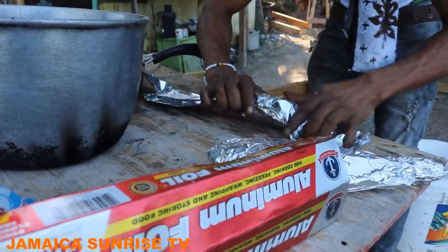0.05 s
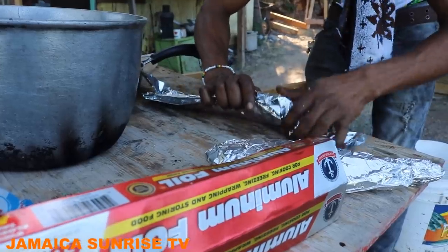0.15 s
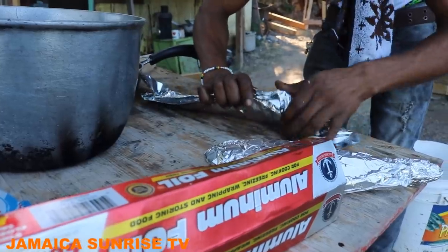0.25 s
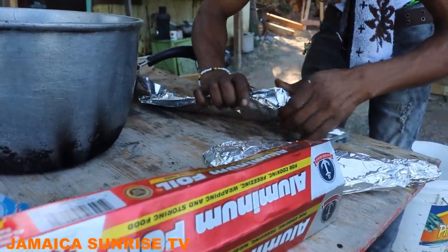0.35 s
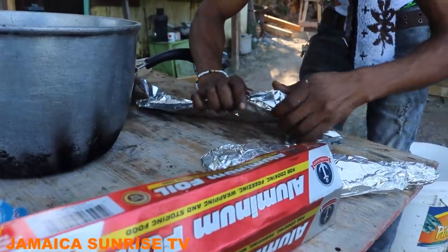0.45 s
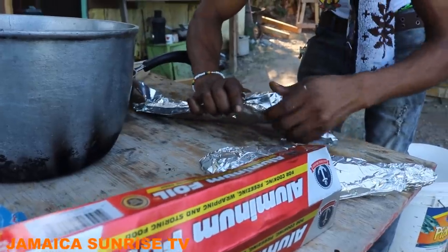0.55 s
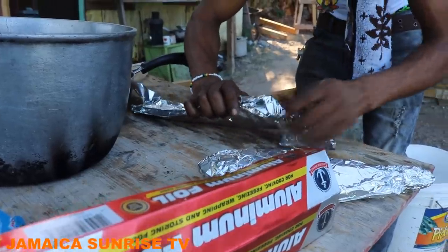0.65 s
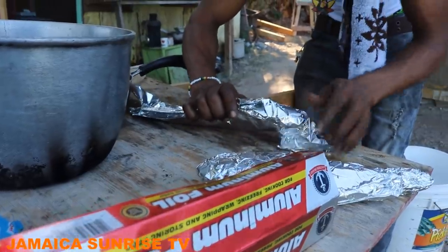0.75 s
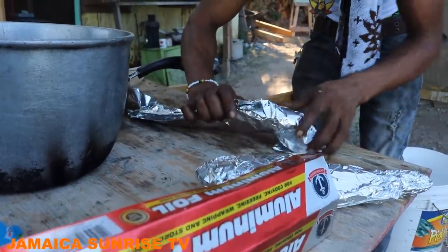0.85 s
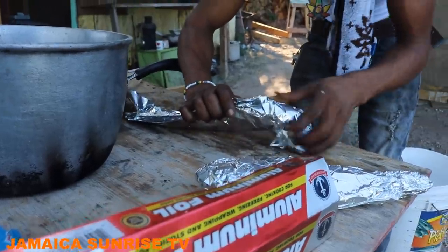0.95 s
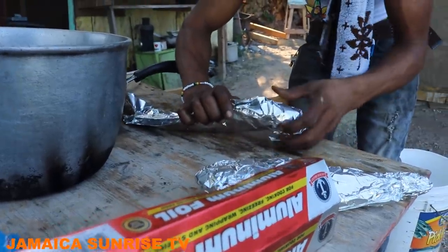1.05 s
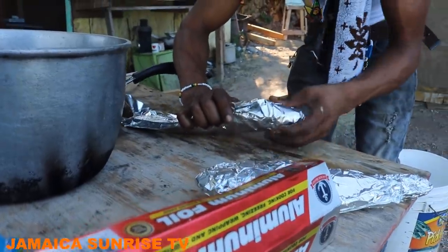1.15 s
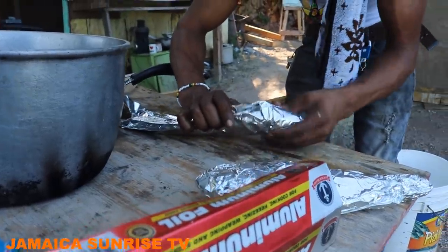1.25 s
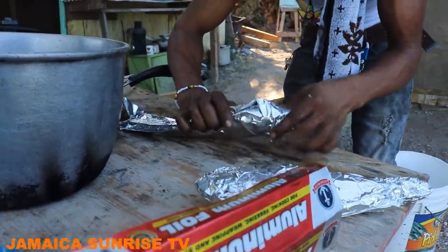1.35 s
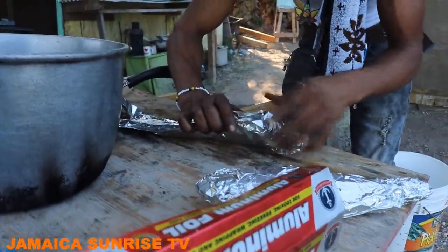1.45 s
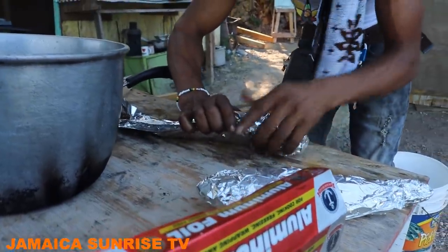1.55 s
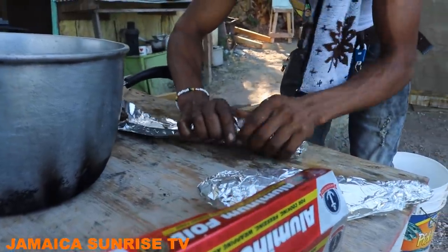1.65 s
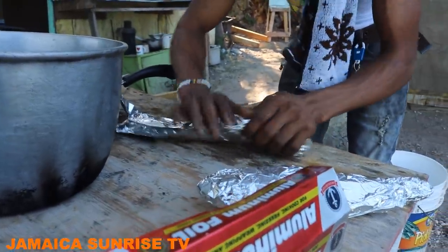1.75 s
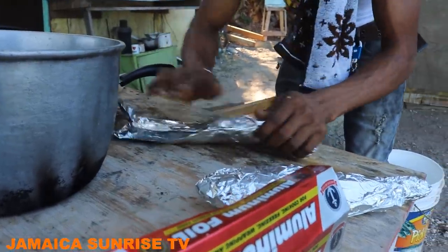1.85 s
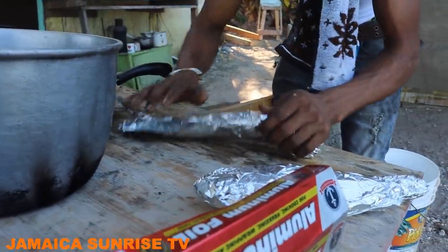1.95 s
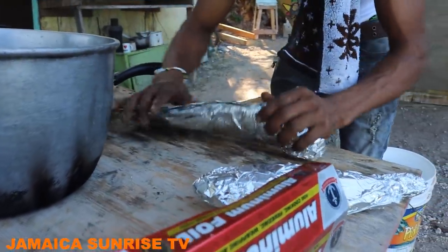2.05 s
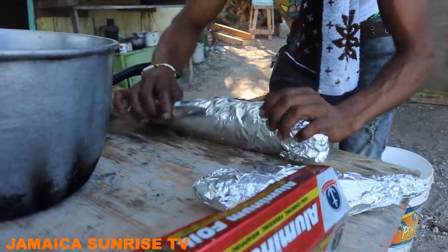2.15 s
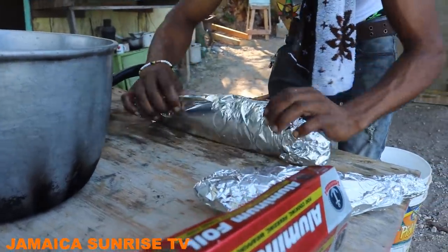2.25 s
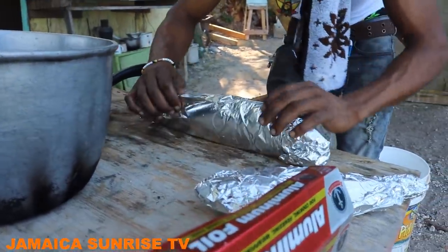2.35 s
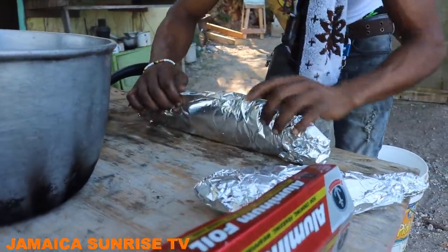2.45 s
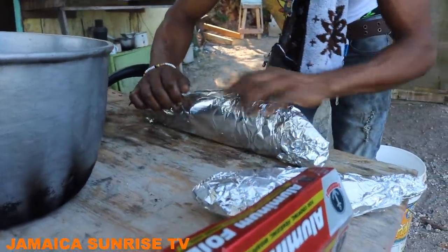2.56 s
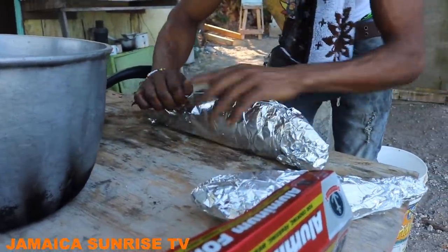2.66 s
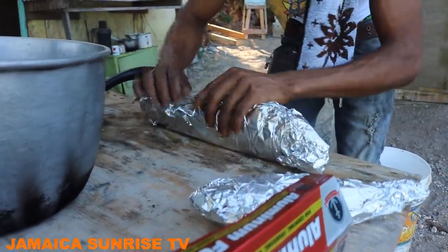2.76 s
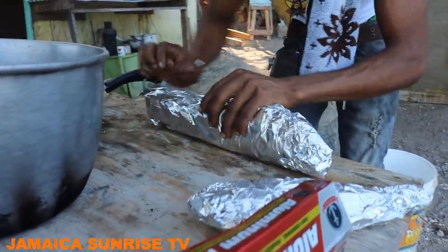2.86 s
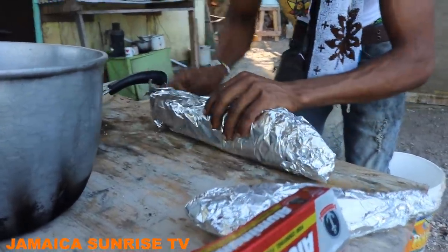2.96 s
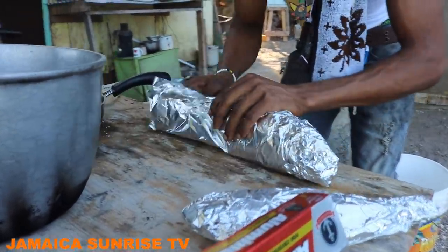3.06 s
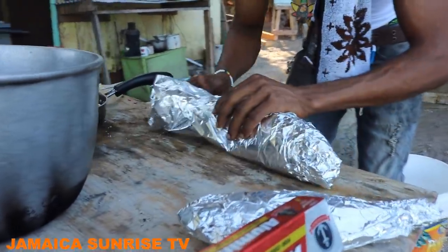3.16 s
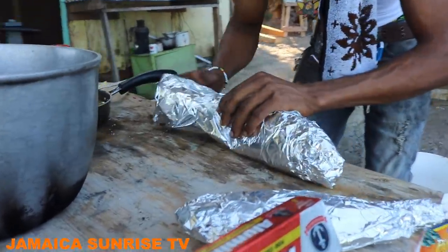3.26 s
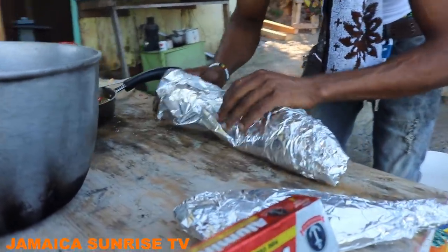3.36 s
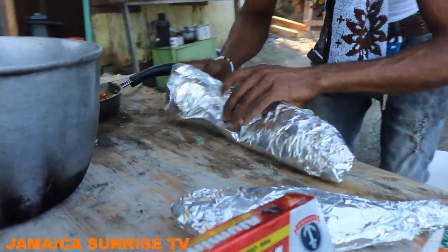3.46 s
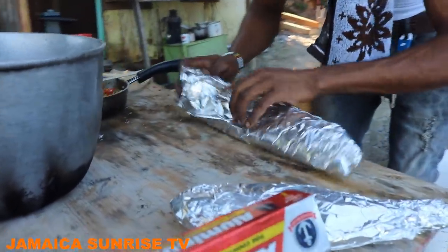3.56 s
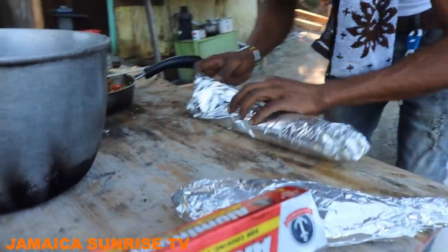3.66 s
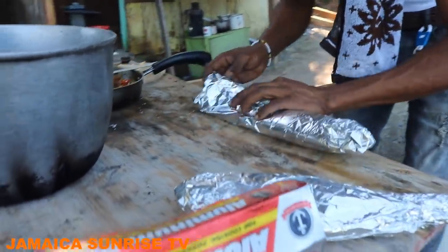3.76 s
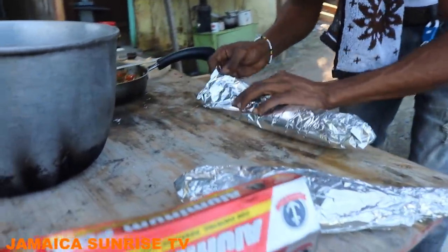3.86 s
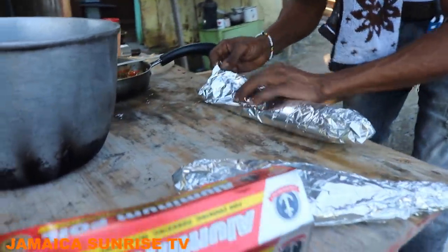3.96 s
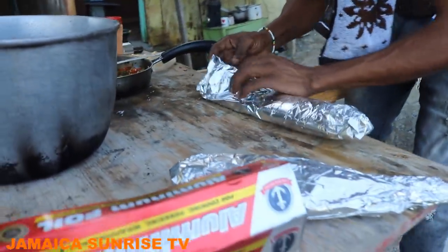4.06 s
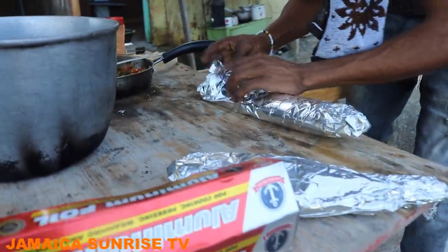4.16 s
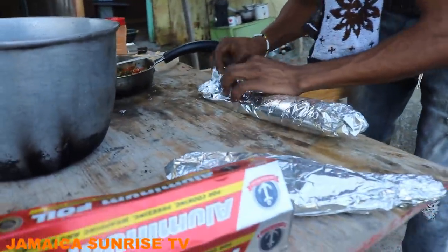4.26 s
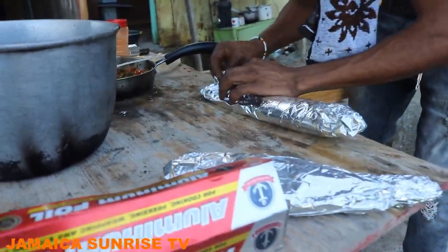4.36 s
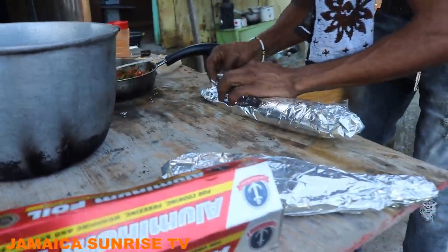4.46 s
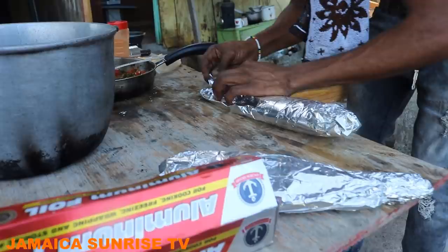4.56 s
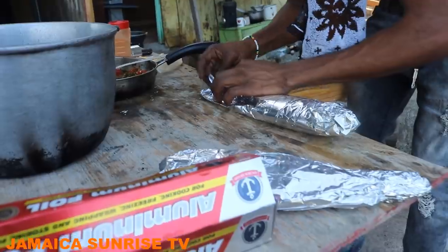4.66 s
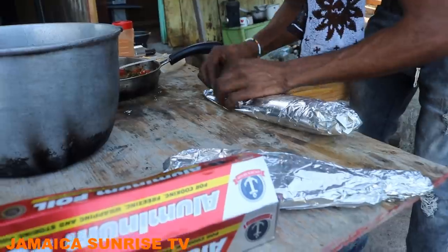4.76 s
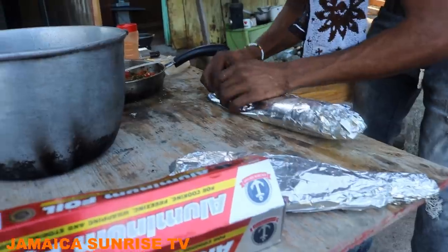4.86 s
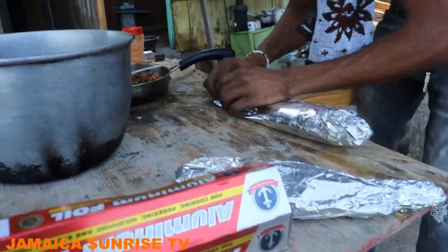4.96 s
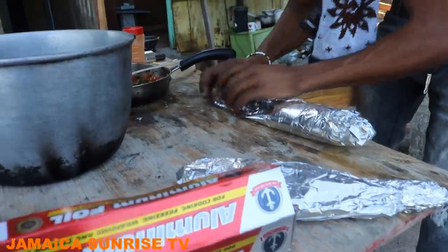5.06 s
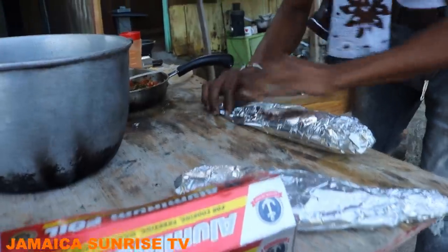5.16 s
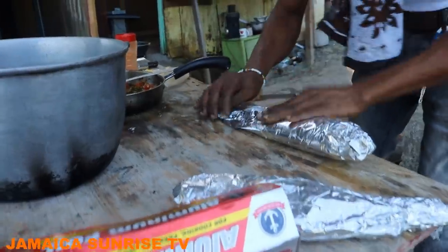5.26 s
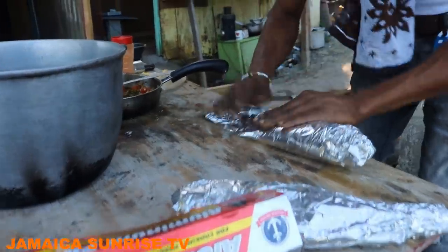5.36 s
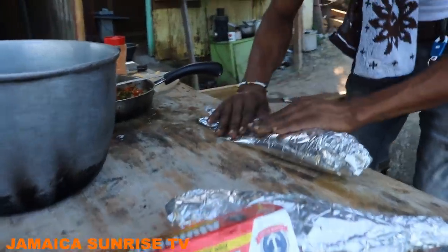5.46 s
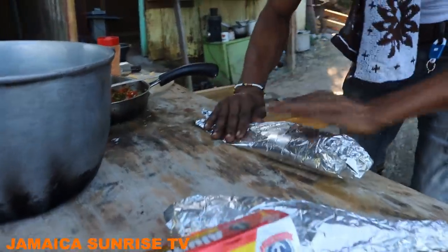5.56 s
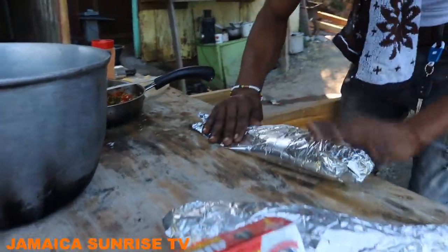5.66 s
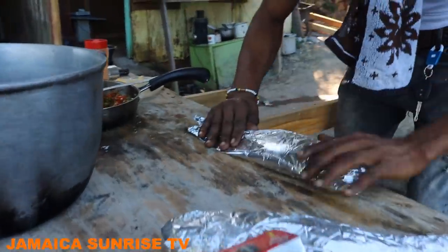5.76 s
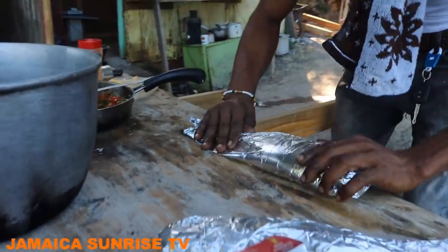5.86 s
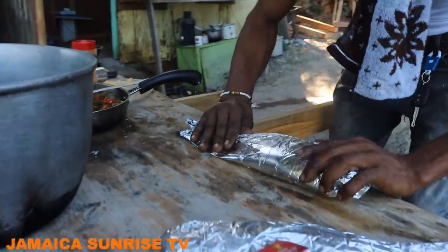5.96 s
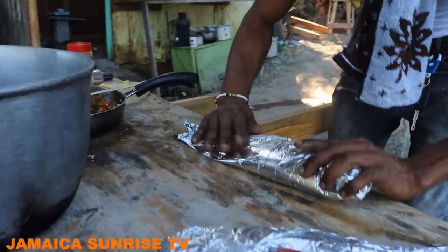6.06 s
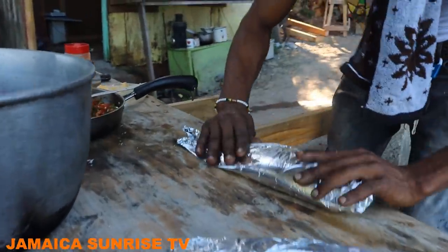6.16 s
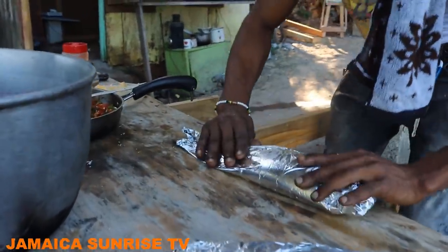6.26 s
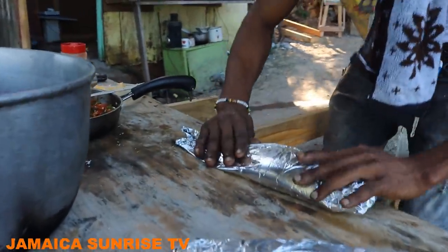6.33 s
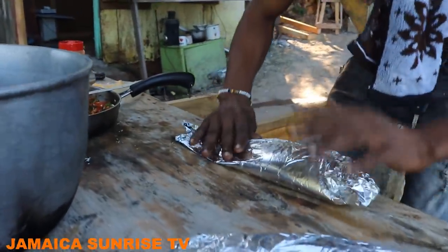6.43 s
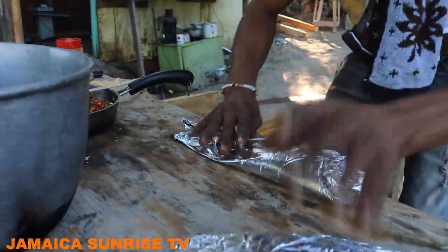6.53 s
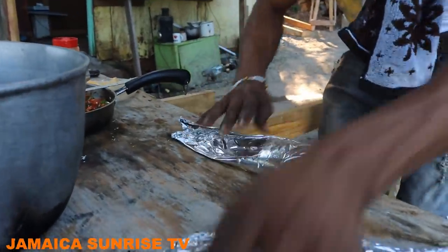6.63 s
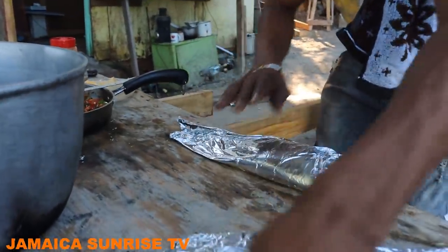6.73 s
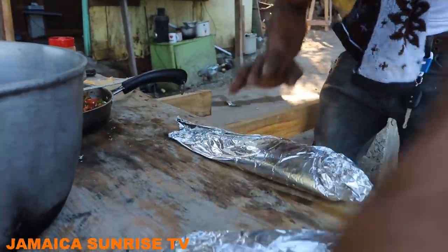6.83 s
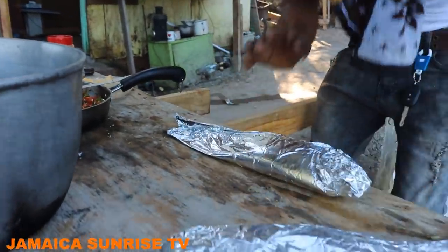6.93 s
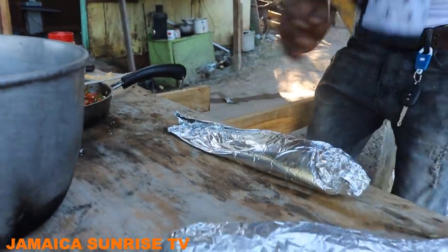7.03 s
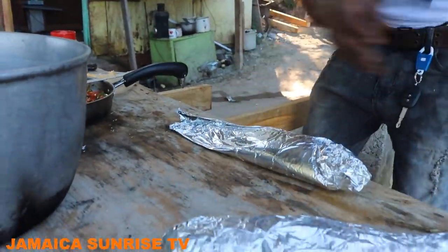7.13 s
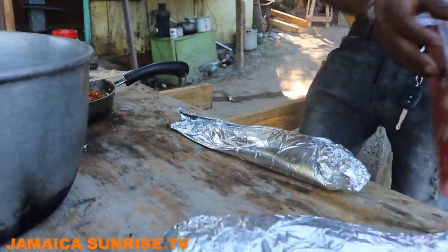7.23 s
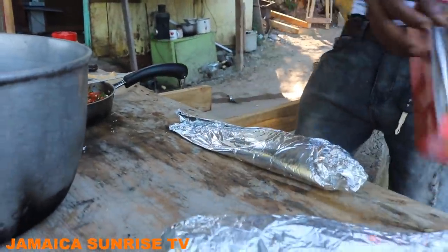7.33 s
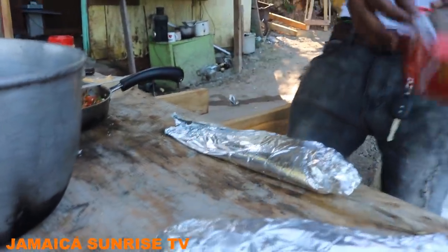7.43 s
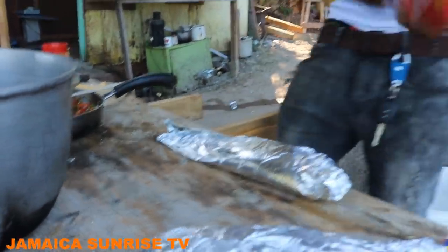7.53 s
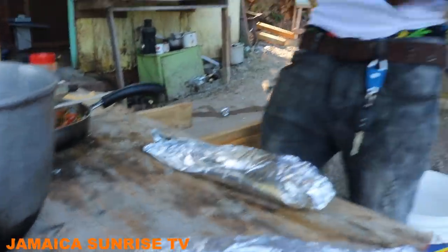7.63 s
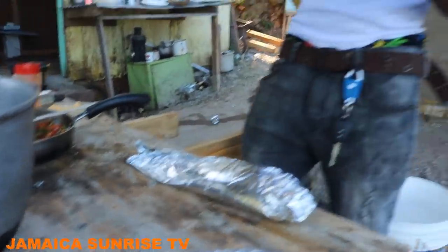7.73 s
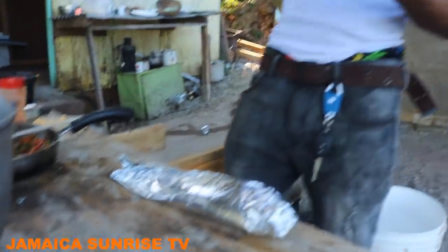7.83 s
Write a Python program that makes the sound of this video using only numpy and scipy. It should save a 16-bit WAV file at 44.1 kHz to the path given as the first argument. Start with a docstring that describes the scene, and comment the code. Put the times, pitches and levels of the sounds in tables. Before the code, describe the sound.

Close outdoor stereo pickup of thin foil being folded and crumpled by hand on a wooden table. Fine dense rustling grows into loud sharp crackles in irregular squeezes, then eases to softer pressing ticks. A firm woody knock follows, then a few last foil snaps and a smaller thud, leaving quiet air. Wind buffets the microphone softly, jumping between sides, mostly in the first half.

```python
"""At a wooden table in a yard outdoors, hands crumple and fold aluminium foil around food.
Creases buckle with short noise bursts heaped around a pitch, sparse loud ones over a dense crackle.
Blows ring the decaying modes of the table top, and filtered noise makes its low booms.
Gusts of wind are low noise at two microphone ports, single low thumps are a few soft cycles,
and the quiet air of the yard is a steady noise with faint drifting patches."""
import sys
import numpy as np
from scipy import signal
from scipy.fft import rfft, irfft
from scipy.io import wavfile
from scipy.ndimage import uniform_filter1d

SR = 44100
rng = np.random.default_rng(int(sys.argv[2]) if len(sys.argv) > 2 else 0)


def generate_wav(sig):
    """Save sig (samples, or channels by samples) to the path in sys.argv[1] as 16-bit PCM at SR."""
    pcm = np.round(np.clip(np.atleast_2d(sig).T, -1, 1) * 32767).astype(np.int16)
    wavfile.write(sys.argv[1], SR, pcm)


N = 347949  # length in samples

# The loudest single creases. Each row: start in seconds, peak of the mean of both ports in dB
# before placing and echoes, pitch in Hz, broad click against the pitch in dB.
LOUD_CREASES = [(0.0496, -25, 2230, -7), (0.5564, -16, 4190, -7), (0.6476, -14, 7310, -7),
                (0.6752, -15, 1570, -9), (0.8268, -19, 1480, -7), (0.8904, -14.5, 2420, -11),
                (0.9358, -13.5, 2640, 2), (1.0906, -13, 7170, -9), (1.2531, -13, 3380, -10),
                (1.3263, -19, 1440, -9), (1.3835, -24, 3450, -7), (1.4293, -22, 3080, -7),
                (1.459, -13.5, 3310, 0), (1.493, -22, 3130, -7), (1.6492, -13, 4410, -7),
                (1.6913, -15, 2570, -7), (1.728, -18, 4100, -7), (1.74, -10, 4600, -18),
                (1.7972, -14, 4390, -19), (2.0315, -9, 4330, 0), (2.0657, -21, 1450, -9),
                (2.164, -18, 2650, -4), (2.2702, -10, 2200, -12), (2.3228, -10.5, 3350, -6),
                (2.4282, -6.5, 3130, -8), (2.467, -7.5, 4340, 1), (2.5256, -13, 2780, -1),
                (2.5573, -15, 3400, -7), (2.6423, -17, 7470, -14), (2.7521, -17.5, 1980, 1),
                (2.7876, -9.5, 4200, -4), (2.8535, -11, 1150, -13), (2.942, -34, 6700, -7),
                (2.958, -12, 4100, -16), (2.9806, -23, 1800, -7), (3.035, -18, 7050, -7),
                (3.0482, -13.5, 4550, -5), (3.07, -13, 3680, -7), (3.0959, -8, 5390, -7),
                (3.1604, -24, 2680, -7), (3.24, -9.5, 3020, -5), (3.2794, -18, 1150, -7),
                (3.3595, -8, 4670, -11), (3.489, -14, 2290, 0), (3.5299, -9, 3380, 2),
                (3.6025, -12.5, 3250, -7), (3.6253, -6, 3240, -7), (3.6677, -12, 3470, -7),
                (3.733, -14, 2070, -10), (3.8601, -8, 2860, -7), (3.8897, -20, 2120, -4),
                (3.9133, -17, 2160, -1), (3.932, -13, 3670, -5), (4.0687, -17, 4480, -7),
                (4.0901, -14.5, 3480, -5), (4.1465, -15, 3050, -12), (4.224, -14, 2910, -13),
                (4.2412, -4.5, 2770, -9), (4.407, -19, 3770, -7), (4.5017, -23, 8480, -7),
                (4.521, -16.5, 3600, -9), (4.57, -20, 2180, -9), (4.594, -8.5, 4630, -14),
                (4.6306, -7, 4700, -15), (4.6597, -13, 4550, -16), (4.7, -12, 6960, -18),
                (4.7232, -23, 3490, -7), (4.784, -13, 3620, -14), (4.8232, -9.5, 4470, -9),
                (4.8726, -15.5, 3370, -7), (4.9107, -18, 3220, -3), (4.9842, -9.5, 3540, 1),
                (5.014, -10, 2210, -5), (5.0742, -20, 3100, -3), (5.1711, -17.5, 3780, -7),
                (5.1871, -16.5, 4630, -7), (5.3163, -13.5, 2770, 3), (5.3582, -6.5, 4940, -17),
                (5.371, -6, 4200, -3), (5.4628, -7.5, 2150, -11), (5.6072, -25.5, 2230, -20),
                (5.653, -28, 3070, -14), (5.6785, -28, 2210, -13), (5.747, -25, 2680, 0),
                (5.7806, -17.5, 3050, 6), (5.8331, -19.5, 2760, -18), (5.8914, -26, 5260, -7),
                (5.9369, -26, 3280, -13), (5.99, -28, 1630, -18), (6.07, -20, 3530, -7),
                (6.109, -19, 2880, 1), (6.1418, -19, 4220, -7), (6.1634, -22, 3080, -7),
                (6.2006, -23, 3170, -5), (6.2193, -28, 2380, -7), (6.24, -18.5, 2350, 5),
                (6.2826, -25, 2240, -7), (6.3023, -20, 3200, -7), (6.3335, -23, 6040, -9),
                (6.3754, -31, 2440, -5), (6.399, -22.5, 7670, -10), (6.427, -23, 2360, -7),
                (6.4582, -34, 3400, -5), (6.4715, -17.5, 2020, 6), (6.53, -29, 3520, -7),
                (6.545, -19, 2590, -2), (6.5774, -29, 3170, -7), (6.6157, -30, 3100, -7),
                (6.7269, -12, 2650, -20), (6.731, -11, 2570, -23), (6.78, -10.5, 2040, -15),
                (6.794, -15, 4520, -15), (6.8843, -17.5, 2260, -9), (6.9456, -31, 2020, -3),
                (6.9758, -32, 2770, 4), (7.1907, -26.5, 2900, -7), (7.224, -26, 3280, -7),
                (7.2499, -23, 3630, -3), (7.2686, -13.5, 1010, -8), (7.3044, -10.5, 2180, -13),
                (7.4632, -20, 3080, -7)]
# Colour of the foil. Each row: frequency in Hz, level in dB per Hz.
FOIL_COLOUR = [(180, -30), (300, -12), (343, -6.5), (412, -19), (455, -10.5), (961, -3), (1300, -5),
               (1530, -1), (1900, -5), (2300, -3.5), (3080, -1.5), (4590, -3), (6000, -7.5), (7950, -4.5),
               (12100, -12.5), (16000, -19)]
# How the ports favour one side. Each row: frequency in Hz, left over right in dB.
PORT_LEAN = [(60, 35), (110, 27), (200, -1), (380, -8), (700, -0.5), (1290, 0.5), (2380, -10), (4400, -3),
             (8120, -4.5), (15000, -3)]
# How far the left port leads on a crease. Each row: frequency in Hz, phase lead in radians.
PORT_LEAD = [(800, 0), (1200, -.5), (1900, -.7), (2700, -.3), (3600, .35), (4200, -.2), (4800, .35),
             (6000, -.2), (8000, 0)]
# Likeness of the two channels in the crackle. Each row: frequency in Hz, likeness from 0 to 1.
CHANNEL_LIKENESS = [(60, .6), (300, .97), (800, .98), (1400, .88), (1900, .6), (3000, .76), (4200, .5),
                    (5700, .2), (6700, .28), (7200, .74), (15000, .6)]
# How crowded the creases come, sliding folds dense, pressing sparse.
# Each row: time in seconds, factor on the rate.
CREASE_CROWDING = [(0, 3.65), (1.2, 2.45), (1.6, 1.78), (2.2, 2.67), (2.5, 1.17), (4.4, 1.02), (5.2, 0.71),
                   (5.9, 0.57), (6.65, 0.37), (6.72, 3.03), (7.89, 2.1)]
# Each squeeze or long drag of the hands. Each row: start in seconds, hold in seconds, effort in dB,
# large folds against the effort in dB, fine wrinkles against the effort in dB.
HAND_SQUEEZES = [(0.0, 0.34, -33.0, -6.5, -4.0), (0.063, 0.055, -38, 2.5, -14),
                 (0.294, 0.034, -29, -0.5, -3.5), (0.368, 0.26, -36.5, -5.5, -4.5),
                 (0.377, 0.026, -28.5, -4, -2.5), (0.476, 0.018, -28, -3, -7.0),
                 (0.559, 0.03, -24.5, -7.5, -6.0), (0.68, 0.024, -22.5, -6, -5),
                 (0.745, 0.0085, -33.5, -5.5, -17), (0.845, 0.0083, -29.5, 1, -22.0),
                 (0.85, 0.57, -31, -7.5, -6), (0.992, 0.046, -24.5, -3, -9), (1.062, 0.012, -30.5, -6, -6),
                 (1.241, 0.021, -30.5, -8, -8), (1.333, 0.017, -33.5, -3.5, -8.0),
                 (1.498, 0.0052, -23, -7, -9.5), (1.56, 0.013, -34.5, -5, -4.5),
                 (1.581, 0.25, -36.5, -8, -7), (1.648, 0.026, -27, -7, -5.5), (1.705, 0.055, -27, -13, -9),
                 (1.883, 0.822, -32, -8.5, -11.5), (1.897, 0.046, -41.5, 10, -19),
                 (2.071, 0.03, -27.5, -2.5, -7), (2.18, 0.033, -21.5, -11, -6.5),
                 (2.238, 0.042, -27.0, -18.0, -12.0), (2.338, 0.032, -30, -4, -9),
                 (2.551, 0.004, -23.5, -8.5, -4), (2.759, 0.064, -30, -1.5, -9.0),
                 (2.856, 0.007, -24.5, -5.5, -18), (2.92, 0.21, -39.5, -8, -13),
                 (3.045, 0.27, -29.5, -6, -10), (3.234, 0.078, -30.5, -1, -12.0),
                 (3.346, 0.86, -34, -9.5, -8), (3.365, 0.024, -31.5, -10, -7), (3.51, 0.087, -27, -5.5, -7),
                 (3.632, 0.14, -26.5, -11, -8), (3.856, 0.035, -34, -5, -8), (3.941, 0.07, -33.0, -23, -7),
                 (4.146, 0.19, -34, -25, -6), (4.152, 0.013, -27, -3.5, -17),
                 (4.243, 0.015, -28.5, -3, -15.0), (4.296, 0.31, -39, -16, -17),
                 (4.308, 0.071, -28, -9, -8), (4.409, 0.018, -27.5, -6, -11),
                 (4.531, 0.016, -33, -24, -2.5), (4.615, 0.45, -35, -12.5, -6.5),
                 (4.66, 0.014, -37, -15, -9), (4.768, 0.083, -28, -16, -18), (4.922, 0.02, -32, -15, -8),
                 (5.095, 0.023, -35.5, -9, -8), (5.19, 0.075, -43.5, -13, -5.0),
                 (5.316, 0.26, -33.5, -10.5, -15), (5.354, 0.004, -26.5, -11.0, -1),
                 (5.448, 0.014, -23, -16, -18), (5.534, 0.023, -33.5, -7, -8.0),
                 (5.633, 0.053, -51.5, 1.0, -18), (5.755, 0.18, -38.5, -11, -9),
                 (5.89, 0.028, -34, -14, -7), (5.99, 0.34, -41, -12, -7.0), (6.052, 0.039, -32, -18, -13.0),
                 (6.149, 0.025, -31.5, -10, -8), (6.39, 0.13, -42, -14, -20), (6.413, 0.026, -43, -7, -6),
                 (6.575, 0.029, -45.5, -14, -17), (6.652, 0.03, -44.5, -12, -9),
                 (6.75, 0.14, -40, -0.5, -25), (6.752, 0.027, -42.5, 7.5, -22.0),
                 (6.793, 0.004, -29, -25.0, -6), (6.874, 0.027, -38.5, -10, -13),
                 (7.176, 0.054, -44.5, 1, -9.0), (7.265, 0.011, -28, -10, -6.5),
                 (7.298, 0.016, -30.0, -10, 0.5), (7.426, 0.082, -43.5, -6, -8),
                 (7.562, 0.038, -47.5, 3, 3), (7.606, 0.04, -53, 8, -10.0)]
# Where the hands work, on top of the lean of the ports. Each row: time in seconds, left over right in dB.
HAND_PLACE = [(0, -4), (0.8, -3), (2.4, -1.5), (4.4, -2), (5.6, -3), (6.6, -3), (6.8, 2), (7.1, -10),
              (7.3, -7.5), (7.89, 0)]
# Blows on the table top. Each row: start in seconds, level in dB before the tilt between ports and
# the echoes, hardness as the pitch in Hz that the blow excites most.
TABLE_BLOWS = [(0.318, -20.5, 620), (0.329, -21, 194), (3.204, -16, 1060), (5.152, -32.5, 264),
               (6.7265, -14.5, 1200), (6.73, -12.5, 385), (6.7366, -15.5, 350), (6.78, -23.5, 450),
               (6.8246, -13.5, 1000), (7.0575, -23.5, 970), (7.267, -17, 320), (7.2689, -15, 900),
               (7.3047, -20, 1000), (7.557, -33, 650)]
# Modes of the boards. Each row: frequency in Hz, level in dB, time to fall by 60 dB in seconds.
BOARD_MODES = [(174, 7, 0.11), (269, -1, 0.096), (348.6, 6.5, 0.062), (411, 5, 0.05), (647, 2.5, 0.032),
               (950, 2.5, 0.02), (1102, 3.5, 0.016), (1725, 2, 0.02), (2200, -4, 0.024), (2810, 8, 0.011),
               (3400, -28, .015)]
# Low booms when a hand or the parcel weighs on the boards. Each row: start in seconds, level in dB.
BOARD_BOOMS = [(0.091, -36), (0.32, -29.5), (5.16, -44), (5.465, -50), (6.4, -46), (6.733, -22),
               (6.79, -44), (6.904, -38), (7.268, -31.5)]
# Colour of the booms. Each row: frequency in Hz, relative level in dB per Hz.
BOOM_COLOUR = [(30, -43), (70, -11), (130, 1), (250, -8), (500, -11), (900, -27), (2000, -57)]
# Gusts of wind. Each row: start in seconds, hold in seconds, level in dB, left over right in dB.
WIND_GUSTS = [(0.333, 0.22, -34.5, -5), (0.857, 0.15, -33, -18), (1.353, 0.16, -33.5, 21),
              (1.618, 0.063, -28.5, -17), (1.843, 0.18, -31.5, -16), (2.209, 0.025, -25, 0),
              (2.22, 0.21, -38.5, -12), (2.464, 0.014, -33, 22), (2.665, 0.07, -28.5, -18),
              (2.7, 0.24, -34, -19), (3.158, 0.3, -33, -5), (3.24, 0.056, -29, -20), (3.55, 0.27, -50, -3),
              (4.105, 0.25, -47, 15), (4.44, 0.02, -50, 20), (4.64, 0.084, -40.5, 22),
              (4.88, 0.12, -46, 13), (5.83, 0.065, -48, 17)]
# Colour of the wind. Each row: frequency in Hz, relative level in dB per Hz.
WIND_COLOUR = [(12, -61), (20, -26), (40, 0), (65, 1), (161, 0), (198, -6.5), (236, -1.5), (528, -30),
               (700, -25), (910, -54), (1540, -120)]
# Single low thumps, wind on one port or table thuds at both.
# Each row: start in seconds, level in dB, pitch in Hz, left over right in dB.
LOW_THUMPS = [(0.323, -30, 207, 0.5), (0.874, -30, 71, -11), (0.938, -29, 82, -24.0), (1.342, -26, 154, 18),
              (1.462, -24.5, 113, 28), (1.598, -21.5, 145, -20), (1.649, -33, 90, -11),
              (1.982, -22.5, 116, -22), (2.187, -26.5, 69.5, -3.0), (2.331, -25, 134, -18),
              (2.465, -25, 94, 23), (2.65, -19.5, 164, -16), (2.699, -28, 67.3, -9),
              (3.158, -26.5, 155, -15.5), (3.212, -23, 95, -2.5), (3.311, -28, 114, 8),
              (3.427, -25, 156, -9), (4.069, -34, 104, 17), (4.186, -31, 104, 21), (4.43, -34, 79, 22),
              (4.61, -30.5, 63, 23), (4.658, -24, 143, 24), (4.873, -34, 161, 3), (5.146, -32.5, 214, 0.0),
              (5.453, -38, 175, 0), (5.829, -37, 61.9, 19), (6.394, -42, 175, 0.0)]
# Colour of the air. Each row: frequency in Hz, relative level in dB per Hz.
AIR_COLOUR = [(15, -62), (25, -32), (58, -33), (76, 0.5), (141, -29.5), (175, -4), (242, -17.5), (285, -10),
              (416, -15.5), (734, -17.5), (796, -17.5), (7920, -32), (16000, -46)]
# Likeness of the air at both ports. Each row: frequency in Hz, likeness from 0 to 1.
AIR_LIKENESS = [(60, 0.87), (180, 0.94), (550, 0.75), (1650, 0.063), (4970, 0.067), (15000, 1.0)]

GRIP_DB_PER_S, EASE_DB_PER_S = 565, 472  # how fast a squeeze comes on and lets go
SPIKE_DB, SPIKE_S = 0.5, 0.00036  # a loud crease opens with a sharp spike
BOOM_HOLD_S, BOOM_RISE_DB_PER_S, BOOM_FALL_DB_PER_S = 0.014, 4000, 298
RISE_DB_PER_S, LULL_DB_PER_S = 300, 297  # how fast a gust comes and goes
AIR_DB = -44.5
EDGE_HZ = 15900  # upper band limit


def foil():
    """Superposition: dense crackle and single loud snaps share one place and one set of echoes."""
    placed = (crackle() + snaps()) * sides(curves(HAND_PLACE)[0])
    return reflected(placed, -10, 0.067)


def crackle():
    """Crackling noise: each give of the sheet snaps folds, creases and wrinkles together, in clumps."""
    start, hold, effort_db, folds_db, wrinkles_db = np.transpose(HAND_SQUEEZES)
    levels_db = effort_db + [folds_db, 0 * hold, wrinkles_db]
    effort = swells(start, hold, levels_db, GRIP_DB_PER_S, EASE_DB_PER_S)
    crowding = curves(CREASE_CROWDING)[0]
    gives_per_s = 1800 * crowding * gain_of(3.5 * wander(25))
    gives = rng.random(N) < gives_per_s / SR
    spread_db = 4.2 * np.minimum(rng.exponential(1, N), 4.2)
    strength = gives * gain_of(spread_db) / np.sqrt(crowding)  # more snaps share the same effort
    uneven = gain_of(2.8 * rng.standard_normal((2, N)))
    folds = buckling(270, 1490, strength * uneven[0]) * effort[0]
    middling = buckling(1790, 7880, strength) * effort[1]
    wrinkles = buckling(8900, 18200, strength * uneven[1]) * effort[2] * gain_of(2.4 * wander(36))
    return folds + middling + wrinkles


def buckling(low_hz, high_hz, strength, count=8, size=8192):
    """Buckling: creases of one size give way, with snap shapes drawn afresh in every stretch
    so that none repeats too long."""
    kind = rng.integers(0, count, N)
    out = np.zeros((2, N + size + 1024))
    for start in range(0, N, size):
        step = (np.arange(count) + rng.random(count)) / count
        hz = low_hz * (high_hz / low_hz) ** step
        t60 = 0.011 * (3000 / hz) ** 0.14 * rng.uniform(0.46, 2.66, count)
        shapes = creases(hz, t60, 0.46, -17.0)
        chosen = kind[start:][:size] == np.arange(count)[:, None]
        trains = strength[start:][:size] * chosen
        sound = signal.fftconvolve(trains[None], shapes, axes=2).sum(1)
        out[:, start:][:, :sound.shape[1]] += sound
    return evened(out[:, :N])


def snaps():
    """Impulsive release: each of the loudest creases has its own pitch, and higher ones die sooner."""
    s, peak_db, hz, click_db = np.transpose(LOUD_CREASES)
    shapes = creases(hz, 0.013 * (3000 / hz) ** 0.82, 0.33, click_db[:, None])
    shapes *= 1 + gain_of(SPIKE_DB) * np.exp(-np.arange(1024) / SR / SPIKE_S)
    peak = abs(shapes.mean(0)).max(1)
    shapes *= (gain_of(peak_db) / peak)[..., None]
    out = np.zeros((2, N + 1024))
    places = np.round(s * SR).astype(int)[:, None] + np.arange(1024)
    np.add.at(out, (slice(None), places), shapes)
    return out[:, :N]


def creases(hz, t60, octaves, skirt_db):
    """Damped resonance: for each pitch a dying burst, at both ports, with its energy heaped around it."""
    t, f = np.arange(1024) / SR, np.fft.rfftfreq(1024, 1 / SR) + 1
    a, b = rfft(rng.standard_normal((len(hz), 2, 1024))).transpose(1, 0, 2)
    alike = np.clip(read(CHANNEL_LIKENESS, f), 0, 1)
    left = a * np.exp(1j * read(PORT_LEAD, f))
    right = alike * a + np.sqrt(1 - alike ** 2) * b
    ratio = f / hz[:, None]
    heap = np.exp(-.5 * (np.log2(ratio) / octaves) ** 2)
    heap = heap + gain_of(skirt_db) / (1 + ratio) ** 0.067  # the broad click
    lean = sides(read(PORT_LEAN, f) - read(PORT_LEAN, 9800))[:, None]
    burst = irfft(np.array([left, right]) * heap * gain_of(read(FOIL_COLOUR, f)) * lean)
    return burst * gain_of(-60 * t / t60[:, None]) * (1 - np.exp(-t / 0.00012))


def knocks():
    """Modal excitation: each blow rings the modes of the boards, those near its own pitch most."""
    t, out = np.arange(6000) / SR, np.zeros(N + 6000)
    hz, db, t60 = np.transpose(BOARD_MODES)[..., None]
    for s, peak_db, blow_hz in TABLE_BLOWS:
        mode_db = db - 9.8 * abs(np.log2(hz / blow_hz)) - 60 * t / t60
        ring = gain_of(mode_db) * np.sin(2 * np.pi * hz * t)
        ring = (ring * (1 - np.exp(-t * hz / 1.6))).sum(0)  # the bass swells slower than the treble
        out[round(s * SR):][:6000] += gain_of(peak_db) * ring / abs(ring).max()
    tilted = out[:N] * gain_of([[-1.5], [1.5]])  # stronger on the right
    return reflected(tilted, -24.0, 0.13)


def reflected(x, db, t60, size=16384):
    """Reflection: table top, pot and body return scattered echoes, drawn afresh in every stretch
    so that no fixed colour builds up."""
    t, out = np.arange(4000) / SR, np.zeros((2, N + size + 4000))
    for start in range(0, N, size):
        signs = rng.choice([-1., 1.], (2, 4000))
        sparse = rng.random((2, 4000)) < .05
        taps = signs * sparse * gain_of(-60 * t / t60) * (t > .0015)
        taps /= np.linalg.norm(taps[0])
        echo = signal.fftconvolve(x[:, start:][:, :size], taps, axes=1)
        out[:, start:][:, :echo.shape[1]] += echo
    return x + gain_of(db) * out[:, :N]


def booms():
    """Low-frequency radiation: a short low rumble of the boards, the same at both ports."""
    start, level_db = np.transpose(BOARD_BOOMS)
    rumble = evened(coloured(rng.standard_normal(N), lambda f: read(BOOM_COLOUR, f)))
    return rumble * swells(start, BOOM_HOLD_S, level_db[None], BOOM_RISE_DB_PER_S, BOOM_FALL_DB_PER_S)


def wind():
    """Turbulence: lumpy low pressure noise, unrelated at the two ports."""
    start, hold, level_db, pan_db = np.transpose(WIND_GUSTS)
    ports = []
    for _ in range(2):
        lumpy = rng.standard_normal(N) * gain_of(3.3 * wander(85))
        ports.append(evened(coloured(lumpy, lambda f: read(WIND_COLOUR, f))))
    share = np.sqrt(2) * sides(pan_db) / np.linalg.norm(sides(pan_db), axis=0)  # keeps the total power
    levels_db = level_db + 20 * np.log10(share)
    return np.array(ports) * swells(start, hold, levels_db, RISE_DB_PER_S, LULL_DB_PER_S)


def thumps():
    """Pressure pulse: a thump is a few soft cycles, wind on one port or a table thud at both."""
    out = np.zeros((2, N))
    for s, level_db, hz, pan_db in LOW_THUMPS:
        turns = np.arange(0, 6, hz / SR)
        thump = np.sin(2 * np.pi * turns) * turns * np.exp(1 - turns / 0.88)
        share = sides(pan_db) / sides(pan_db).mean()
        out[:, round(s * SR):][:, :len(turns)] += gain_of(level_db) * np.outer(share, thump)
    return out


def air():
    """Diffuse field: a steady wash of the yard, partly alike at the ports, with faint drifting patches."""
    frames, hz = N // 256 + 5, np.fft.rfftfreq(1024, 1 / SR)
    a, b, c, d, patches = rng.standard_normal((frames, 513, 5)).T
    patches = uniform_filter1d(patches, 12, 0)  # smooth over frequency
    patches = evened(uniform_filter1d(patches, 14, 1))  # smooth over time
    same = np.clip(read(AIR_LIKENESS, hz), -1, 1)[:, None]
    left = a + 1j * b
    right = same * left + np.sqrt(1 - same ** 2) * (c + 1j * d)
    z = np.array([left, right]) * gain_of(read(AIR_COLOUR, hz)[:, None] + 1.6 * patches)
    wash = signal.istft(z, nperseg=1024, noverlap=768)[1][:, :N]
    return gain_of(AIR_DB) * evened(wash)


def swells(start, hold, levels_db, rise_db_per_s, fall_db_per_s):
    """Addition of powers: events rise, hold and fall; one envelope for each row of levels."""
    t = np.arange(0, N + 64, 64) / SR
    before = np.maximum(start[:, None] - t, 0)
    after = np.maximum(t - (start + abs(hold))[:, None], 0)
    shape_db = -rise_db_per_s * before - fall_db_per_s * after
    power = gain_of(levels_db) ** 2 @ gain_of(shape_db) ** 2
    return np.array([np.interp(np.arange(N) / SR, t, np.sqrt(p)) for p in power])


def coloured(x, db_at):
    """Minimum-phase filtering: a causal filter whose gain follows db_at(Hz), down to -100 dB."""
    db = np.maximum(db_at(abs(np.fft.fftfreq(4096, 1 / SR))), -100)
    log_gain = np.log(gain_of(db))
    taps = np.fft.ifft(np.exp(np.conj(signal.hilbert(log_gain)))).real[:2048]
    return signal.oaconvolve(x, taps)[:len(x)]


def wander(hz):
    """Slow random modulation: noise smoothed to about hz changes a second."""
    f = np.fft.rfftfreq(N, 1 / SR)
    return evened(irfft(rfft(rng.standard_normal(N)) / (1 + (f / hz) ** 2), N))


def sides(pan_db):
    """Level difference between ports: gains of left and right, half the decibels each way."""
    return gain_of(np.array([pan_db / 2, -pan_db / 2]))


def read(points, hz):
    """Spectral interpolation: values between table points on a logarithmic frequency axis."""
    f, value = np.transpose(points)
    return np.interp(np.log(hz + 1), np.log(f + 1), value)


def curves(rows):
    """Temporal interpolation: each column of a table drawn as a curve over all samples."""
    s, *columns = np.transpose(rows)
    return [np.interp(np.arange(N) / SR, s, c) for c in columns]


def gain_of(db):
    """Decibel law: amplitude ratio of a level."""
    return 10 ** (np.asarray(db) / 20)


def evened(x):
    """Normalisation: scales to a root mean square of one."""
    return x / np.sqrt(np.mean(x ** 2) + 1e-20)


def scene():
    """Superposition: the pressures of all sources add."""
    return foil() + knocks() + booms() + wind() + thumps() + air()


def record(dry):
    """Band limitation: a linear-phase low-pass removes what lies above the edge."""
    taps = signal.firwin(511, EDGE_HZ, window=("kaiser", 9), fs=SR)
    return signal.oaconvolve(dry, taps[None], "same")


dry = scene()
out = record(dry)
generate_wav(out)
```